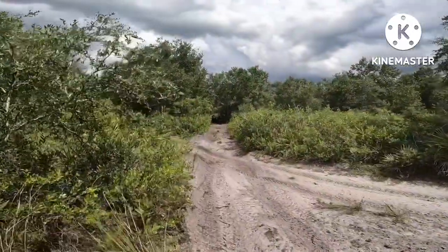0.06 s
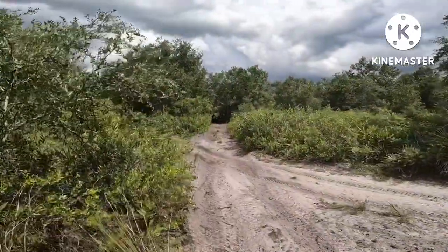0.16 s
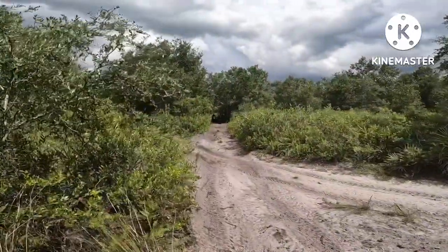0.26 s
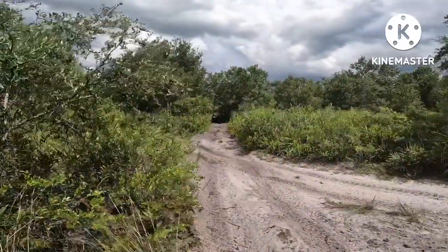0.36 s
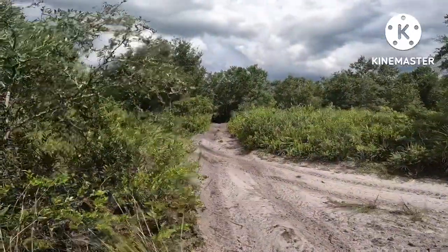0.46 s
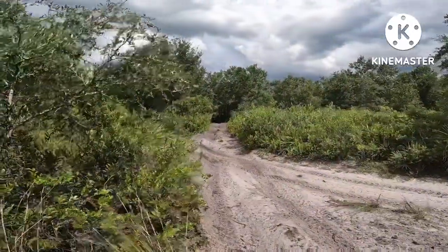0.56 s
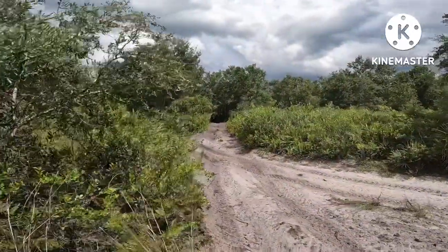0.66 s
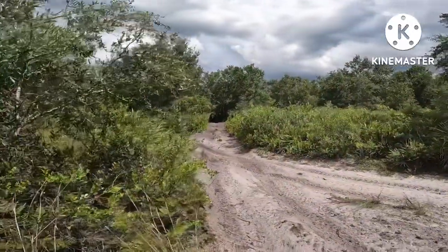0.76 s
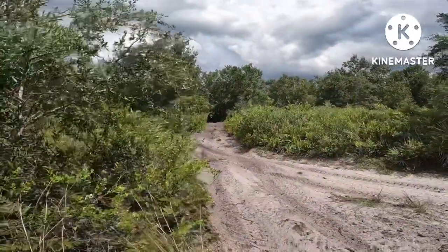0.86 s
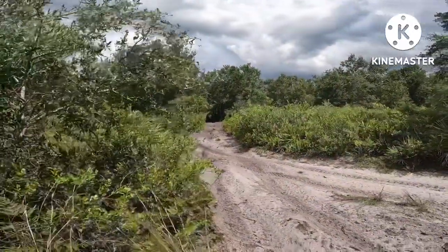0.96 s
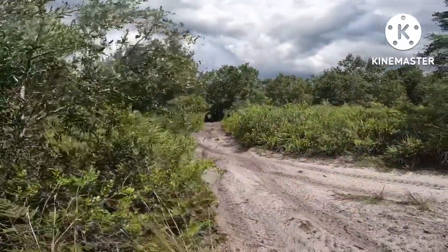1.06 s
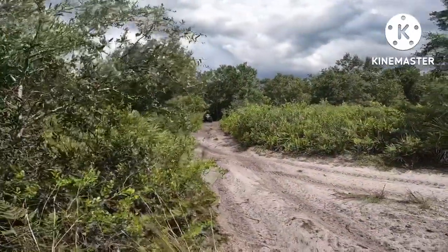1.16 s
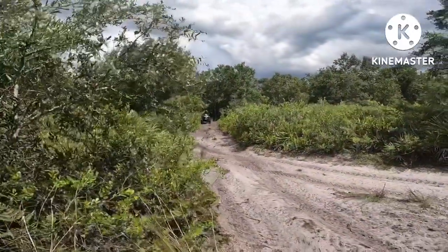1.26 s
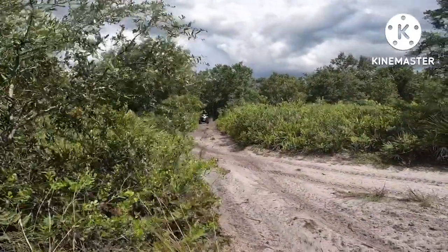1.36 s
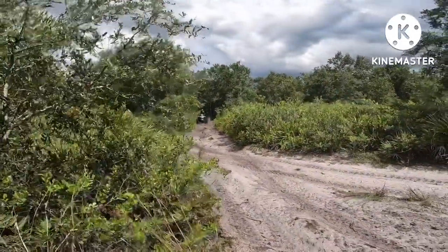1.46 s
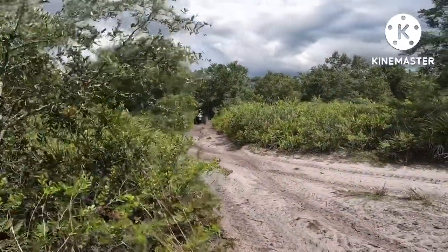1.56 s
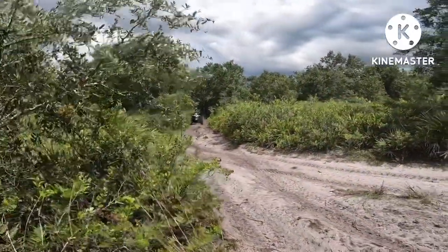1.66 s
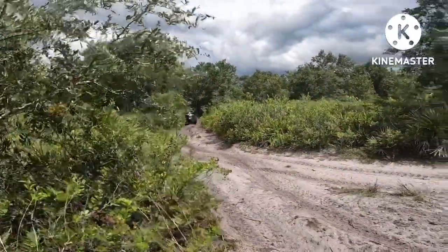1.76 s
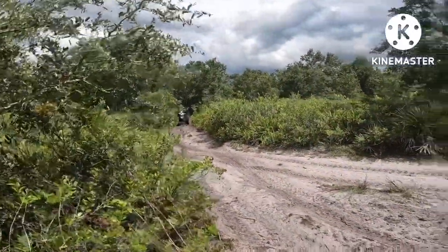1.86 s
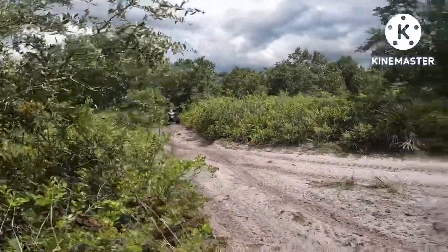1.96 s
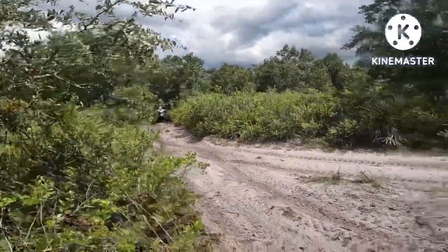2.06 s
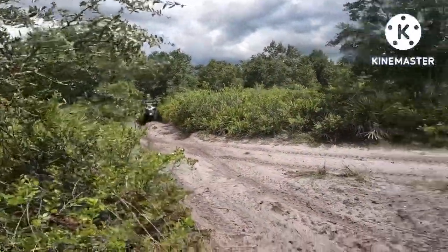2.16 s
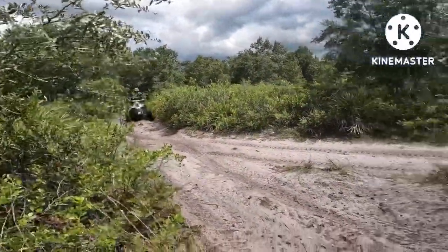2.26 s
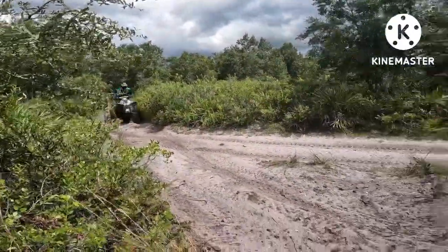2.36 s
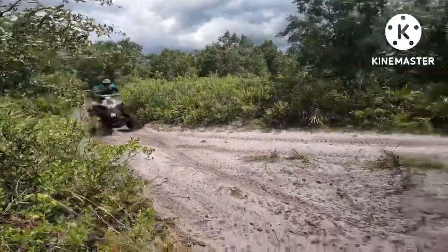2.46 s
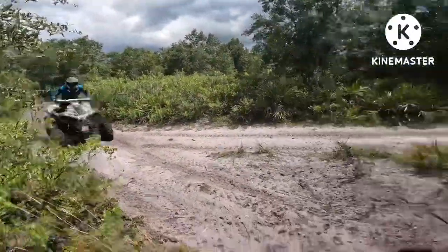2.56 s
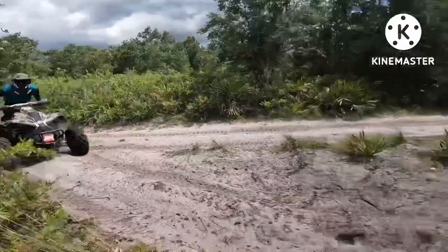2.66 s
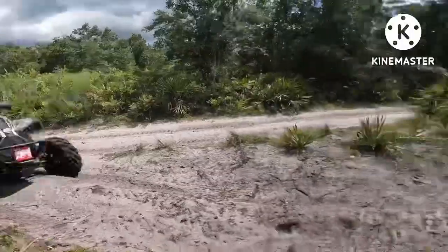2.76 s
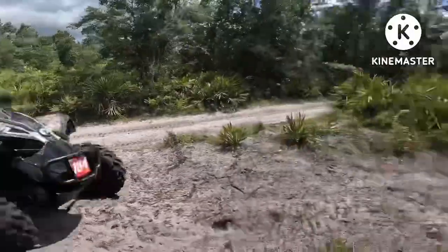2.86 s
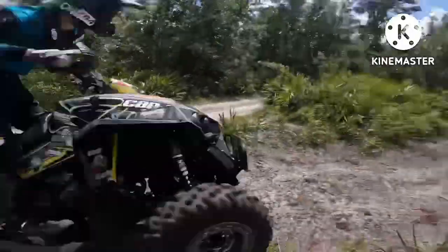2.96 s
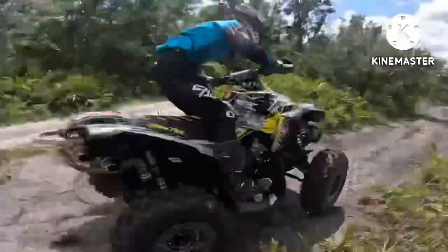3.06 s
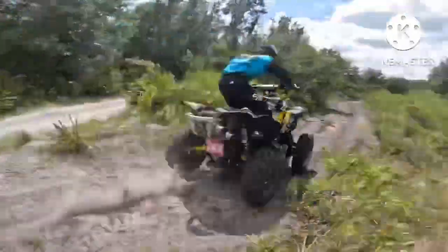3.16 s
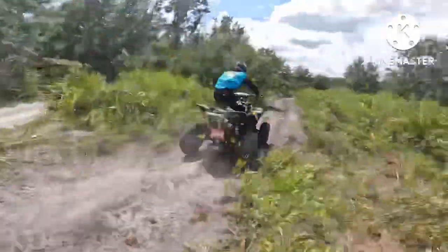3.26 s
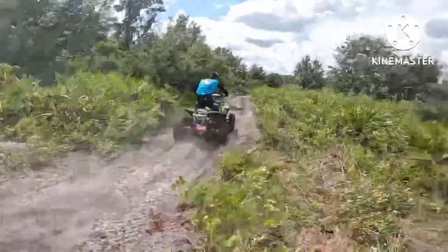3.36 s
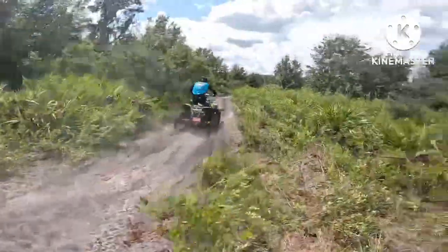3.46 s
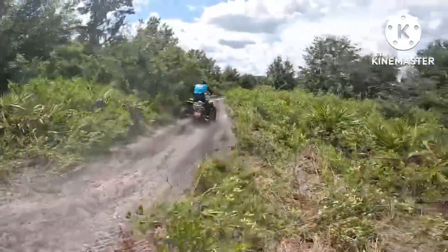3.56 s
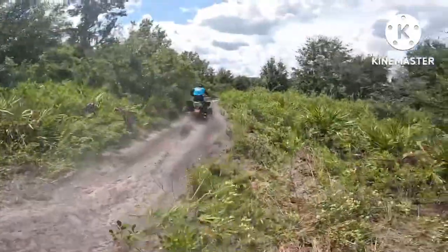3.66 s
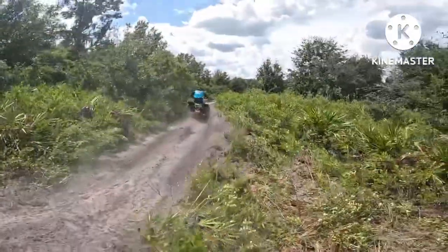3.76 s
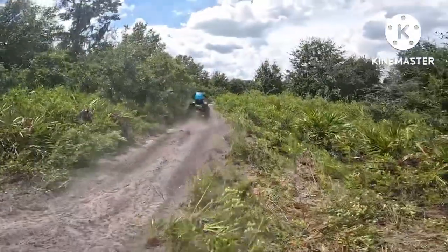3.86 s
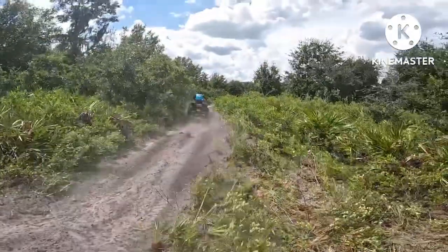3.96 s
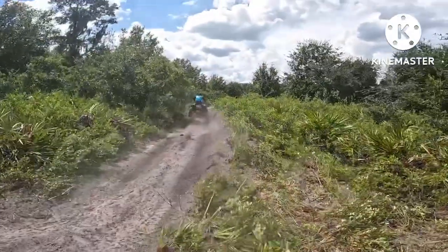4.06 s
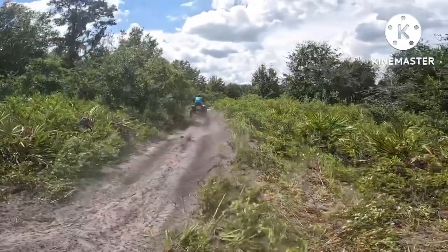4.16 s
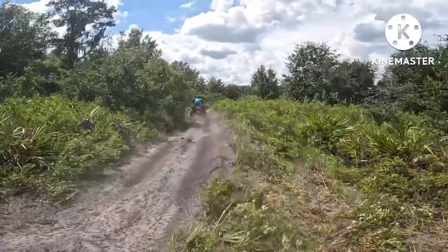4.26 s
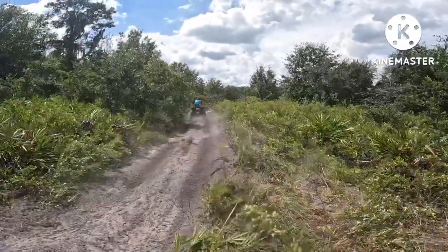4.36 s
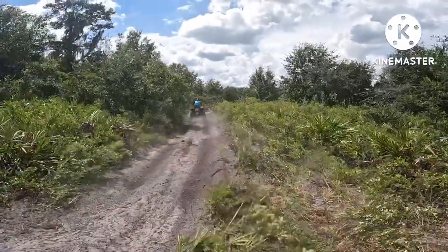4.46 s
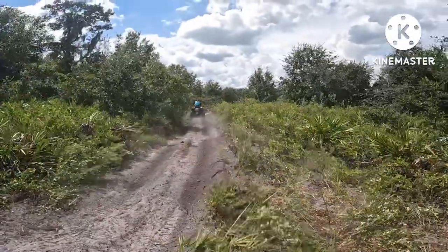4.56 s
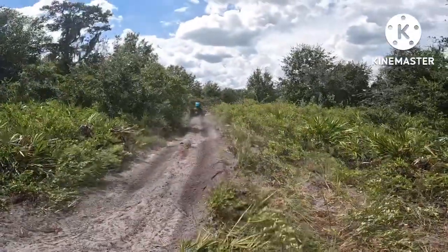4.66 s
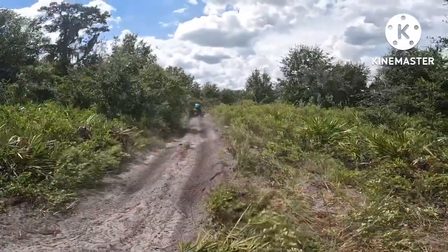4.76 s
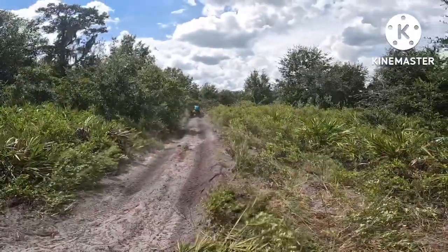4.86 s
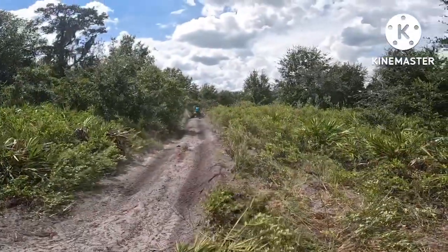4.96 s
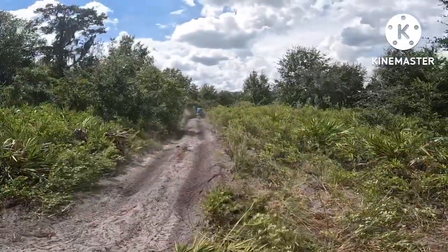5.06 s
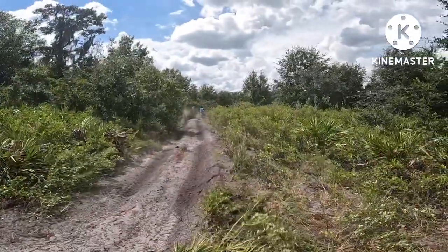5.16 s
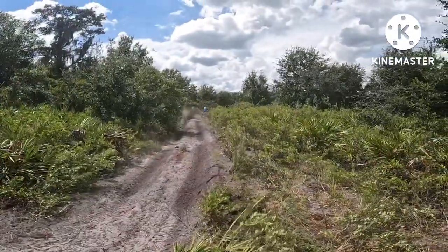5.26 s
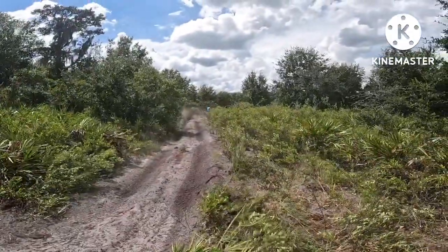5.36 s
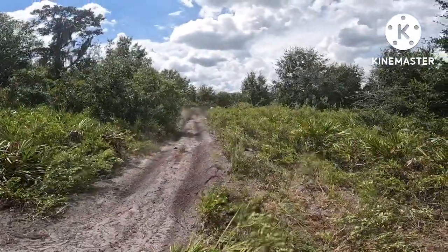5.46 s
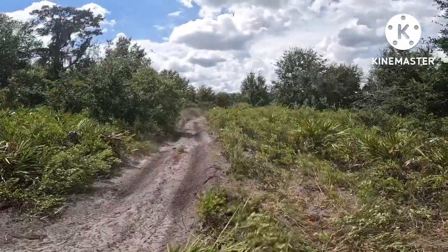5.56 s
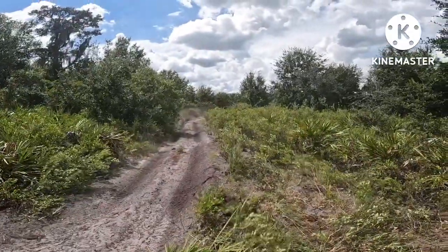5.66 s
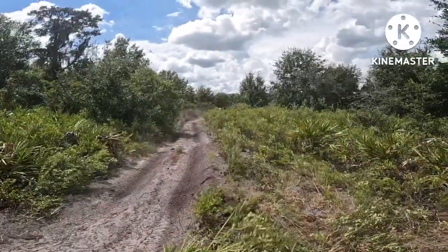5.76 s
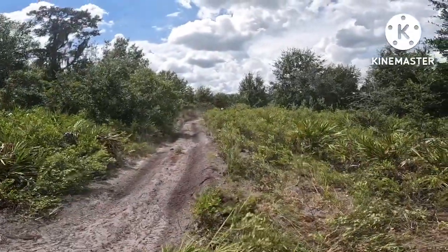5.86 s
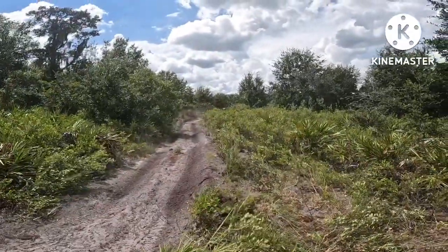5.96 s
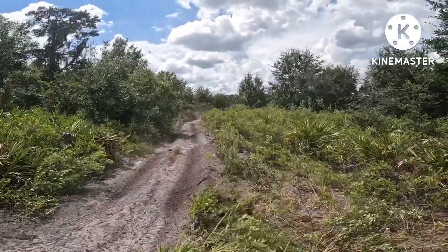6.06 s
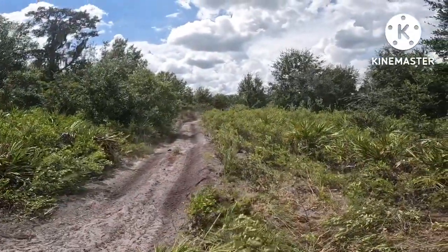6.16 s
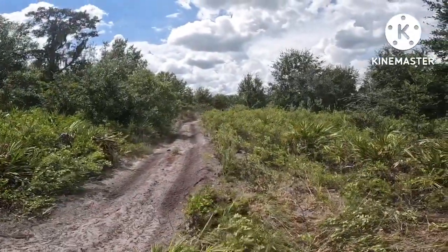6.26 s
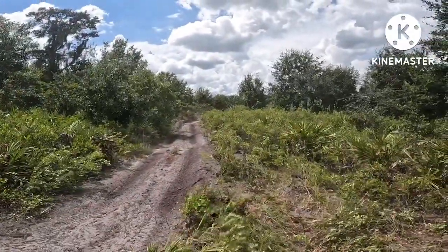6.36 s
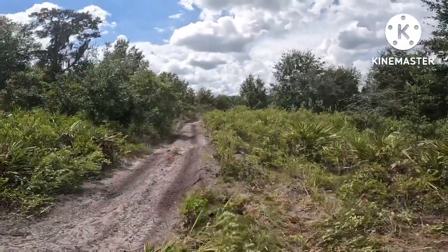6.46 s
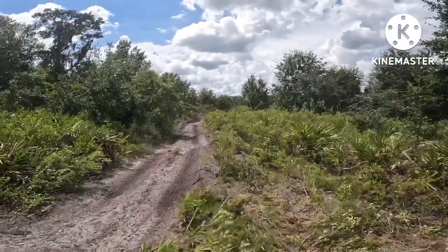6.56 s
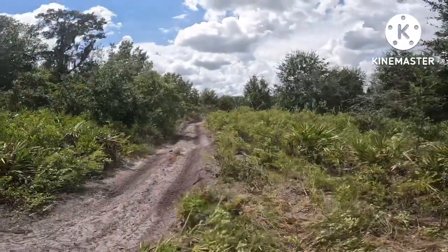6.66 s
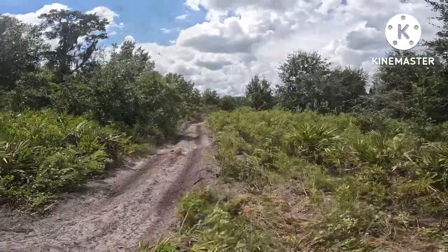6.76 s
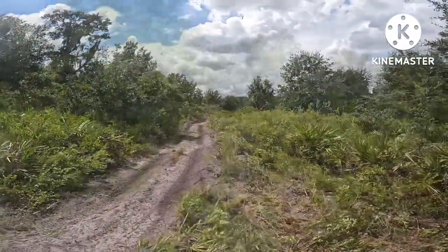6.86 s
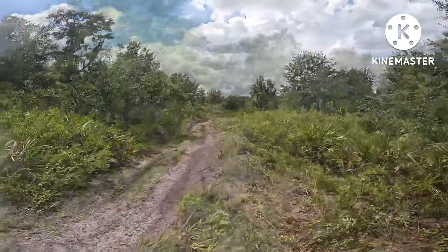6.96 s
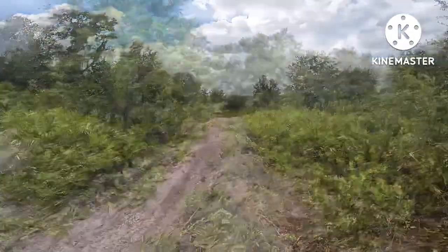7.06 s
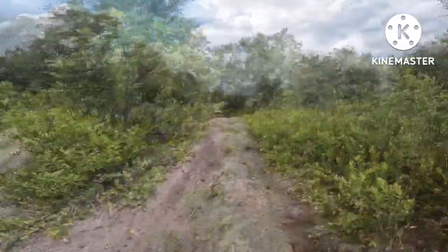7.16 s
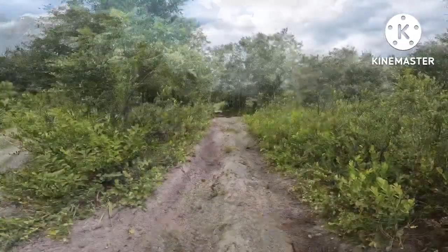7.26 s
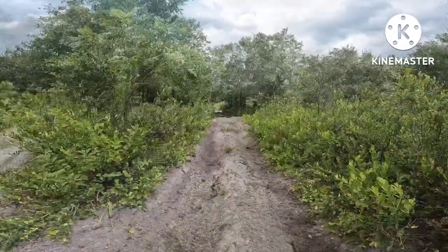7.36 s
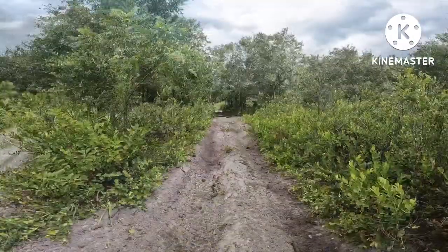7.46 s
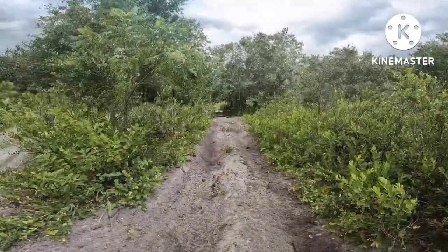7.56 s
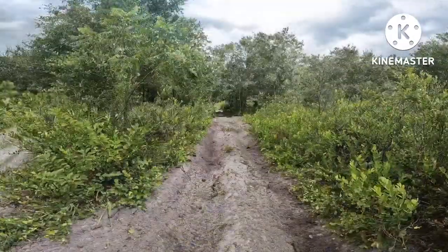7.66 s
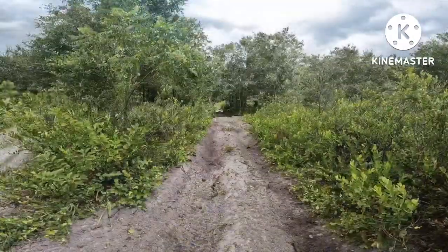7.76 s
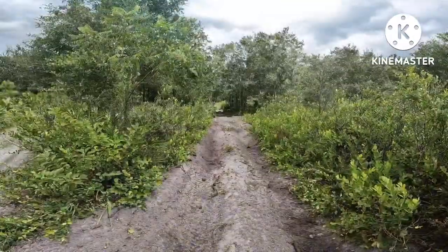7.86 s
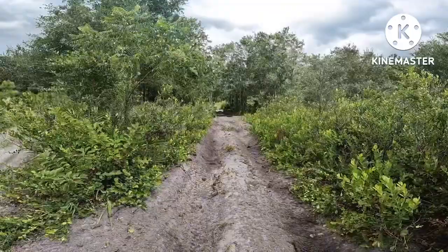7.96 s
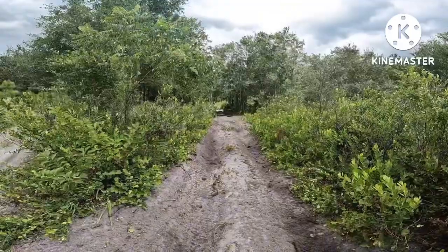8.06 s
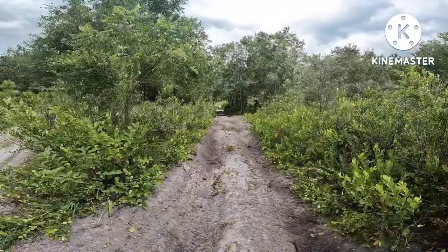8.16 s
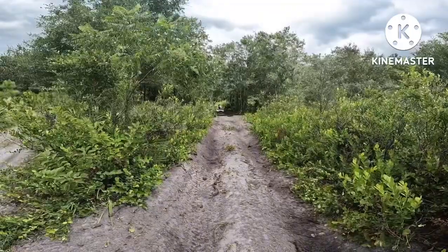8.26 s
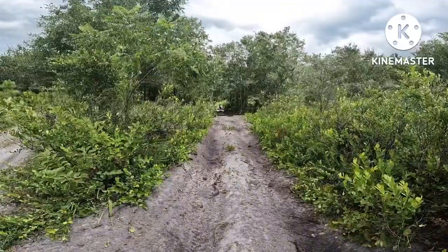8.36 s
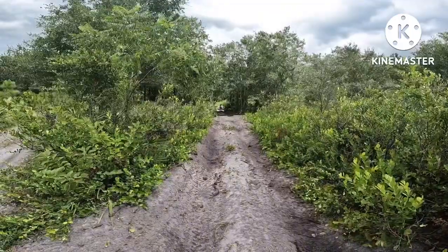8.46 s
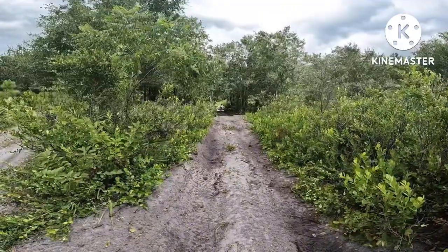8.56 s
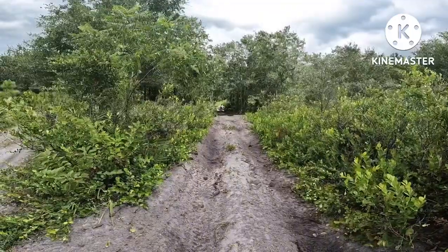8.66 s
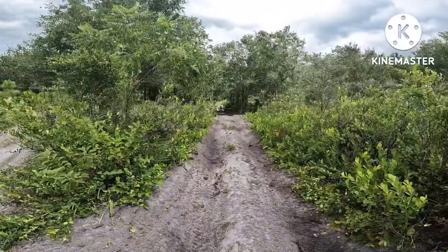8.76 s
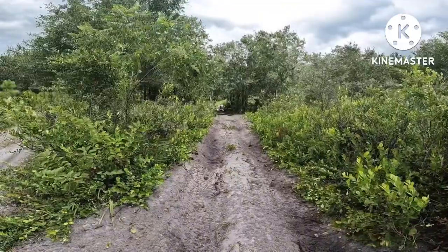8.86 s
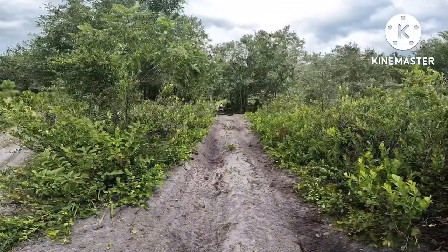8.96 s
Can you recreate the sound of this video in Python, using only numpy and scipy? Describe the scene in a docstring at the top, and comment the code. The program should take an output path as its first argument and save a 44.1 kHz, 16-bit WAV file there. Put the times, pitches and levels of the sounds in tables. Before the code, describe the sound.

Heard from the side of a sandy trail, a two-cylinder all-terrain vehicle revs and drops back again and again. Its drone grows brighter and falls in pitch as it passes close, with drive train whirr, hissing sand and a few ticks of grit. A light gust rumbles on the microphone. The vehicle then accelerates away with a rasping, popping tailpipe, turning duller and quieter before the revs rise again.

```python
"""An uneven exhaust drone comes first: a V-twin quad bike on a sandy trail, on and off the throttle.
It passes close to the microphone and pulls away, its tailpipe rasping under hard load and popping
when the throttle is blipped. Drive train and tyres whirr, sand sprays, grit ticks against the
bodywork, and a little wind buffets the microphone at the side of the trail."""
import sys
import numpy as np
from scipy.fft import rfft, irfft, next_fast_len
from scipy.io import wavfile
from scipy.ndimage import uniform_filter1d

SR = 44100
rng = np.random.default_rng(int(sys.argv[2]) if len(sys.argv) > 2 else 0)


def pcm_store(signal):
    """Save signal as 16-bit PCM."""
    levels = np.round(np.clip(np.atleast_2d(signal), -1, 1) * 32767)
    wavfile.write(sys.argv[1], SR, levels.astype(np.int16).T)


N = 397782
TIME = np.arange(N) / SR

# engine speed, both cylinders firing once a cycle: t/s, cycle rate/Hz
ENGINE_SPEED = [(0, 55.96), (.17, 55.55), (.43, 63.14), (.58, 51.24), (.73, 51.5), (.83, 56), (1.0, 55.94),
                (1.21, 62.13), (1.37, 52.67), (1.48, 53.9), (1.58, 50.45), (1.76, 51.38), (2.13, 58.9),
                (2.31, 55.57), (2.41, 50.55), (2.51, 50.88), (2.65, 45.42), (2.79, 50.44), (2.91, 43.15),
                (3.01, 45.51), (3.21, 39.61), (3.3, 41.1), (3.54, 37.59), (3.87, 32.88), (4.02, 34.24),
                (4.1, 32.05), (4.29, 32.17), (4.52, 26.78), (4.7, 28.98), (4.97, 48.17), (5.1, 52.5),
                (5.25, 42.97), (5.53, 49.08), (5.67, 42.83), (5.9, 52.44), (6.1, 50.11), (6.22, 52.91),
                (6.4, 40.72), (6.76, 40.53), (7.13, 36.71), (7.33, 37.81), (7.87, 29.47), (8.3, 47.87),
                (8.49, 38.43), (8.82, 53.85), (9.02, 57.75)]
# twists of the throttle: opens/s, shuts/s, opening 0-1, time to open/s
THROTTLE_TWISTS = [(-.1, 0.498, 0.73, .2), (0.541, 1.488, 0.98, .1), (1.594, 2.359, 0.96, 0.034),
                   (2.462, 2.548, 1, .03), (2.662, 2.809, 0.92, .03), (2.931, 3.024, 0.85, .03),
                   (3.187, 3.315, 0.94, 0.037), (3.367, 3.469, 0.73, .02), (3.47, 4.33, 0.26, .02),
                   (4.611, 4.653, 1, .015), (4.718, 5.124, 0.96, 0.038), (5.223, 5.55, .98, .02),
                   (5.665, 6.228, .95, 0.039), (6.422, 6.49, 0.86, .02), (6.641, 6.769, 0.58, .02),
                   (6.901, 6.98, 0.94, .02), (7.189, 7.229, .8, .02), (7.888, 8.291, 0.98, .2),
                   (8.519, 9.1, 1, 0.017)]
# base levels at the microphone, before load and speed: t/s, drone/dB, bark/dB, whirr/dB, sand/dB
TRAIL_LEVELS = [(0, -17.5, -49.5, -40.5, -48.5), (1.1, -16, -45, -39, -46), (1.7, -16, -36, -38, -45.5),
                (2.4, -13.5, -36, -38, -45.5), (2.85, -14, -30.5, -32, -41.5),
                (3.1, -14, -29.5, -27.5, -35.5), (3.3, -15, -31, -31, -40), (3.6, -16, -42.5, -33.5, -40),
                (3.9, -18.5, -41, -37, -46), (4.55, -17, -44.5, -35, -39), (4.8, -15.5, -39.5, -35, -43.5),
                (5.3, -15.5, -43.5, -40.5, -45.5), (6.2, -16, -47, -38.5, -51),
                (6.8, -18.5, -60, -42, -56.5), (7.35, -24, -63.5, -50, -61.5),
                (7.8, -22, -61.5, -49.5, -59), (8.2, -18, -49, -41.5, -57), (8.5, -19, -51.5, -48, -50),
                (9.02, -17.5, -50, -44, -51.5)]
# balance of the low exhaust orders: order, pulling/dB, coasting/dB
LOW_ORDERS = [(1, 0.5, -6.5), (2, 1, -2.5), (3, -1.5, -1), (4, -13.5, -5), (5, -2, -8), (6, -9, -8.5)]
# resonances of the exhaust: f/Hz, gain/dB
PIPE_RESPONSE = [(30, -29), (50, -9.5), (62, -8.5), (80, 1.5), (100, 0), (130, 0.5), (160, 1), (195, -1.5),
                 (230, -5), (270, -5.5), (320, -5), (370, 0.5)]
MUFFLER_RESPONSE = [(180, 7), (270, 12.5), (340, 9), (420, 4), (510, -8.5), (620, -14.5), (760, -17.5),
                    (900, -38.5), (1080, -16.5), (1250, -30.5), (1600, -15.5), (2200, -25)]
ASTERN_RESPONSE = [(75, 3), (105, -12), (135, -2), (162, 6), (195, -6), (240, 11.5), (285, -2.5),
                   (325, -5.5), (390, -1.5), (455, 4), (510, 0.5), (590, 11), (720, -2.5)]  # added with the microphone just behind the tailpipe
# gas tearing out of the tailpipe, base levels at full throttle: t/s, rasp/dB, sizzle/dB
RASP_LEVELS = [(4.69, -33, -35), (5.08, -25.5, -33), (5.36, -27.5, -26), (5.54, -29, -40.5),
               (5.7, -26.5, -47), (5.9, -28, -39.5), (6.22, -31.5, -45), (6.5, -35.5, -60),
               (6.95, -35, -56), (7.3, -45, -70)]
# single hard firings: t/s, level/dB, sizzle relative to that level/dB
EXHAUST_POPS = [(4.628, -15.5, -11.5), (4.641, -20, -3), (5.661, -19.5, -32), (6.44, -27, -38),
                (6.92, -29, -29), (6.945, -24, -35), (6.97, -28, -16)]
# grit striking the bodywork: t/s, level/dB
GRIT_HITS = [(0.2688, -42.5), (2.598, -36.5), (3.244, -30), (3.303, -44), (3.643, -45)]
# noise spectra: f/Hz, relative level/dB
RUMBLE_SPECTRUM = [(25, -28), (60, -11), (110, -9.5), (180, 8), (260, -1.5), (400, -35.5), (800, -59.5)]
RASP_SPECTRUM = [(280, -28), (480, -5), (534, -1), (583, -17), (716, 1.5), (839, -12), (959, 7.5),
                 (1040, -1), (1580, -5.5), (1970, -13), (2130, -18.5), (3010, -20.5), (4000, -29),
                 (5200, -52), (8800, -120)]
SIZZLE_SPECTRUM = [(1500, -4.5), (2800, 5.5), (4000, -2), (5200, -8.5), (7400, -8.5), (9000, -16.5),
                   (11000, -23), (13300, -29), (15000, -48.5)]
WHIRR_SPECTRUM = [(200, -3.5), (400, 4.5), (600, 3), (780, -1), (980, 4.5), (1350, 0.5), (1900, -13),
                  (2800, -36.5), (6000, -57)]
SAND_SPECTRUM = [(900, -19.5), (1700, 7), (2900, 2), (4000, -3), (5200, -5), (7300, -8), (9000, -15.5),
                 (11000, -23), (13300, -32), (14500, -54)]
GRIT_SPECTRUM = [(3000, -32.5), (7000, -1.0), (12500, -5.5), (15000, -18)]
WIND_SPECTRUM = [(8, -30.5), (22, 0), (35, -2), (60, -33), (150, -40), (400, -85)]
# likeness of the noise in the microphone's left and right channels: f/Hz, correlation 0-1
STEREO_LIKENESS = [(100, 0.95), (500, 0.92), (2000, 0.96), (5000, 0.99), (9000, 0.98), (13000, 0.35)]

SECOND_FIRING = 0.376  # share of a cycle between the two cylinders
CRACK_AT, PASS_AT = 5.308, 3.39  # s: the leading cylinder fires; the tailpipe passes the microphone
DRONE_LOAD_DB, BARK_LOAD_DB, WHIRR_LOAD_DB, SAND_LOAD_DB = 2.5, 13, 5, 3.5  # gain at full throttle
CRUISE_HZ, WHIRR_DB_PER_HZ, SAND_DB_PER_HZ = 50, 0.22, 0.42  # gain with engine speed above cruising
UPPER_FOLLOW, UPPER_REF_DB = 0.37, -44.5  # upper drone orders follow the bark: dB per dB, from here
PIPE_LEAD_HZ = 50  # below this the pipe's mouth shifts the wave ahead by more than a radian
MUFFLER_SHIFT_RAD = -0.33  # phase shift of the higher orders
RASP_SHUT_DB, RING_DB, TEAR_DB = -23, 1.5, -1  # rasp gains: throttle shut, ringing part, noisy part


def exhaust_drone(cycles, speed, pull, drone_db, bark_db):
    """Low orders slide through the pipe's resonances: clean under load, stumbling when coasting."""
    coast, behind = 1 - pull, astern()
    roughness = .03 + .15 * coast ** 2
    stumble = wander(cycles)
    # with the throttle shut each pulse starts as a gulp instead of a push
    gulp = .55 + np.pi * uniform_filter1d(1. * (pull < .15), size=1400)
    tone, power = 0, 0
    for order, pulling_db, coasting_db in LOW_ORDERS:
        hz = order * speed
        pipe_db = at_hz(PIPE_RESPONSE, hz) + behind * at_hz(ASTERN_RESPONSE, hz)
        upper_db = np.clip((order - 3) / 2, 0, 1) * UPPER_FOLLOW * (bark_db - UPPER_REF_DB)
        gain = amp(pull * pulling_db + coast * coasting_db + pipe_db + upper_db)
        size = 1 + roughness * (1.4 * stumble + 1.8 * wander(cycles))
        shift = np.angle(twin_pulses(order)) + gulp + PIPE_LEAD_HZ / hz + roughness * wander(cycles)
        tone += gain * size * np.cos(2 * np.pi * order * cycles + shift)
        power += gain ** 2 / 2
    churn = amp(-22.5 + 4.5 * coast ** 2) * noise(RUMBLE_SPECTRUM)
    return amp(drone_db + DRONE_LOAD_DB * pull) * (tone / np.sqrt(power) + churn)


def exhaust_bark(cycles, speed, pull, bark_db):
    """Higher orders slide through the muffler's resonances, brightest close to the microphone."""
    shaken = cycles + (.0012 + .006 * (1 - pull) ** 2) * wander(2 * cycles)
    close, behind = bell(PASS_AT, width_s=0.51), astern()
    tone, power = 0, 0
    for order in range(7, 31):
        hz, pulses = order * speed, twin_pulses(order)
        muffler_db = at_hz(MUFFLER_RESPONSE, hz) + behind * at_hz(ASTERN_RESPONSE, hz)
        tilt_db = 11 * close * np.log2(np.minimum(hz, 600) / 400)
        size = abs(pulses) * amp(muffler_db + tilt_db)
        tone += size * np.cos(2 * np.pi * order * shaken + np.angle(pulses) + MUFFLER_SHIFT_RAD)
        power += size ** 2 / 2 * np.clip((hz - 310) / 60, 0, 1)  # the sharp part sets the level
    return tone / np.sqrt(power) * amp(bark_db + BARK_LOAD_DB * pull + 0.89 * wander(2 * cycles))


def tailpipe_rasp(cycles, speed, pull):
    """Heard from behind, each firing under load rings the pipe and tears the air; hard ones pop."""
    rasp_db, sizzle_db = curves(RASP_LEVELS) + RASP_SHUT_DB * (1 - pull)
    facing = uniform_filter1d(1. * (TIME > RASP_LEVELS[0][0]) * (TIME < RASP_LEVELS[-1][0]), size=900)
    second_db = np.interp(speed, [37, 45], [-2, -12])  # lugging, both cylinders crack nearly alike
    puff_s = .0032
    puffs = facing * firings(cycles, speed, puff_s, second_db, scatter_db=1.9, ring=np.ones(SR))
    echoes = firings(cycles, speed, puff_s, second_db, scatter_db=1.0, ring=rng.standard_normal(SR))
    pipe = facing * unit_rms(filtered(echoes, lambda hz: amp(at_hz(RASP_SPECTRUM, hz))))
    tear, sizzle = puffs * amp(rasp_db + TEAR_DB), puffs * amp(sizzle_db)
    for start, db, bright_db in EXHAUST_POPS:
        pop = amp(db) * burst(TIME - start, attack_s=0.00046, decay_s=puff_s)
        tear += pop
        sizzle += pop * amp(bright_db)
    return pipe * amp(rasp_db + RING_DB) + tear * noise(RASP_SPECTRUM) + sizzle * noise(SIZZLE_SPECTRUM)


def throttle():
    """The rider's twists: 1 while the engine pulls hard, 0 while it coasts."""
    shut_s = 0.019
    twists = [opening * np.clip(np.minimum((TIME - opens) / ramp, 1 - (TIME - shuts) / shut_s), 0, 1)
              for opens, shuts, opening, ramp in THROTTLE_TWISTS]
    return np.max(twists, axis=0)


def firings(cycles, speed, decay_s, second_db, scatter_db, ring):
    """One puff a cycle from each cylinder, every puff playing the same ring; rms 1."""
    puffs = 0
    for offset, db in ((0, 0), (SECOND_FIRING, second_db)):
        count, part = np.divmod(cycles + 1 - offset, 1)
        sizes = amp(scatter_db * rng.standard_normal(size=1024))
        age = part / speed
        envelope = amp(db) * sizes[count.astype(int)] * burst(age, attack_s=0.0011, decay_s=decay_s)
        puffs += envelope * ring[(age * SR).astype(int)]
    return unit_rms(puffs)


def twin_pulses(order):
    """Complex weight of an order: two unevenly spaced pulses favour 2, 3, 5 and 8."""
    return 1 + amp(1.0) * np.exp(-2j * np.pi * order * SECOND_FIRING)


def astern(middle_s=3.734, half_s=0.64):
    """1 while the quad pulls away with its tailpipe close to the microphone."""
    return np.exp(-((TIME - middle_s) / half_s) ** 6)


def drive_whirr(speed, pull, flutter, whirr_db):
    """Intake and drive train flutter with the firings, louder with load and speed."""
    level_db = whirr_db + WHIRR_LOAD_DB * pull + WHIRR_DB_PER_HZ * (speed - CRUISE_HZ)
    return amp(level_db + 1.2 * wander(30 * TIME)) * flutter * noise(WHIRR_SPECTRUM)


def tyre_sand(speed, pull, flutter, sand_db):
    """Sand leaves the tyres in clumps, louder with load and speed."""
    level_db = sand_db + SAND_LOAD_DB * pull + SAND_DB_PER_HZ * (speed - CRUISE_HZ)
    spray_db = 9 * bell(3.15, width_s=.06)  # one spray right by the microphone
    roost = np.exp(-np.abs(TIME - PASS_AT - .3) / 0.97)  # the rear tyres fling clods back
    clumps_db = (0.67 + 2.5 * roost) * wander(90 * TIME) + 3.2 * roost * wander(900 * TIME)
    sand = amp(level_db + spray_db + clumps_db) * (.5 + 0.96 * flutter) * noise(SAND_SPECTRUM)
    return sand * amp([[.5], [-.5]])  # slightly to the left


def grit_ticks():
    """Thrown grains tick on the plastic bodywork."""
    ticks = sum(amp(db) * burst(TIME - start, attack_s=.0001, decay_s=.0009) for start, db in GRIT_HITS)
    return ticks * noise(GRIT_SPECTRUM)


def microphone_wind():
    """Low lumps of air on the microphone, with one gust in the quad's wake."""
    breeze_db = -51 + 2.5 * wander(9 * TIME)
    gust_db = 24 * bell(4.3, width_s=0.33)
    return amp(breeze_db + gust_db) * noise(WIND_SPECTRUM)


def amp(db):
    """Decibels to gain."""
    return 10 ** (np.asarray(db) / 20)


def unit_rms(x):
    """x at rms 1."""
    return x / np.sqrt(np.mean(x ** 2) + 1e-20)


def at_hz(points, hz):
    """Read (frequency, value) points on a log frequency axis."""
    freqs, values = np.transpose(points)
    return np.interp(np.log(hz + 1), np.log(freqs + 1), values)


def curves(rows):
    """One value per sample for each column after the time."""
    times, *columns = np.transpose(rows)
    return [np.interp(TIME, times, column) for column in columns]


def wander(position):
    """A random curve with a new value at each whole position."""
    knots = rng.standard_normal(size=4096)
    return np.interp(position, np.arange(len(knots)), knots)


def bell(middle_s, width_s):
    """A bell curve in time."""
    return np.exp(-((TIME - middle_s) / width_s) ** 2)


def burst(age, attack_s, decay_s):
    """A quick rise and an exponential fall."""
    age = np.maximum(age, 0)
    return (1 - np.exp(-age / attack_s)) * np.exp(-age / decay_s)


def filtered(x, response):
    """x through a frequency response."""
    size = next_fast_len(N + SR // 2)
    return irfft(rfft(x, size) * response(np.fft.rfftfreq(size, 1 / SR)), size)[..., :N]


def noise(spectrum):
    """Coloured stereo noise of rms 1, nearly mono below the high treble."""
    def mid_side_gains(hz):
        spread = np.arccos(np.clip(at_hz(STEREO_LIKENESS, hz), 0, 1)) / 2
        return amp(at_hz(spectrum, hz)) * [np.cos(spread), np.sin(spread)]
    mid, side = filtered(rng.standard_normal((2, N)), mid_side_gains)
    return unit_rms(np.array([mid + side, mid - side]))


def scene():
    """The quad from the trailside: one crankshaft and one throttle drive all the engine's sounds."""
    speed, = curves(ENGINE_SPEED)
    drone_db, bark_db, whirr_db, sand_db = curves(TRAIL_LEVELS)
    pull = throttle()
    cycles = np.cumsum(speed) / SR
    cycles += 1 - np.interp(CRACK_AT, TIME, cycles) % 1
    pressure_cycles = cycles - .1  # the pressure peaks a little after the valve cracks open
    drone = exhaust_drone(pressure_cycles, speed, pull, drone_db, bark_db)
    bark = exhaust_bark(pressure_cycles, speed, pull, bark_db)
    rasp = tailpipe_rasp(cycles, speed, pull)
    pulses = firings(cycles, speed, decay_s=0.018, second_db=6.0, scatter_db=0.0, ring=np.ones(SR))
    flutter = unit_rms(0.69 + pulses)
    whirr = drive_whirr(speed, pull, flutter, whirr_db)
    sand = tyre_sand(speed, pull, flutter, sand_db)
    return drone + bark + rasp + whirr + sand + grit_ticks() + microphone_wind()


def record(dry):
    """The microphone chain rounds off the highest peaks and keeps nothing above its band limit."""
    ceiling, top_hz = .85, 15700
    rounded = dry / (1 + np.abs(dry / ceiling) ** 10) ** (1 / 10)
    return filtered(rounded, lambda hz: hz < top_hz)


dry = scene()
out = record(dry)
pcm_store(out)
```